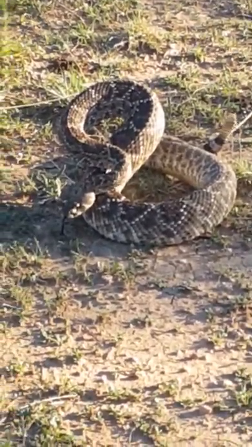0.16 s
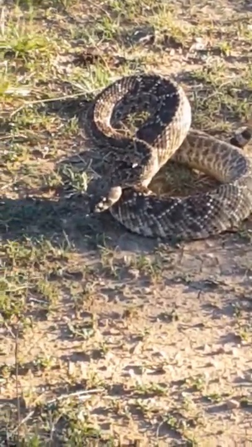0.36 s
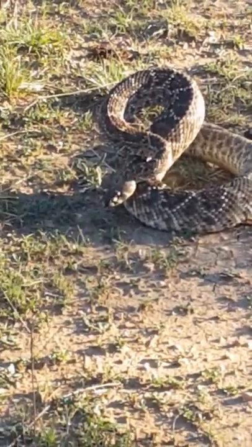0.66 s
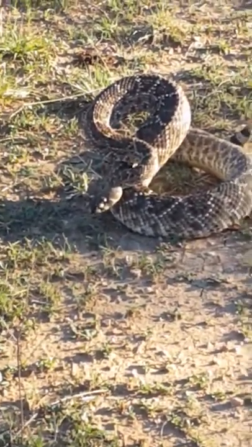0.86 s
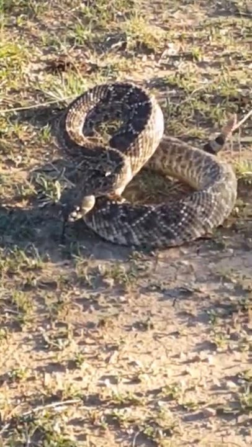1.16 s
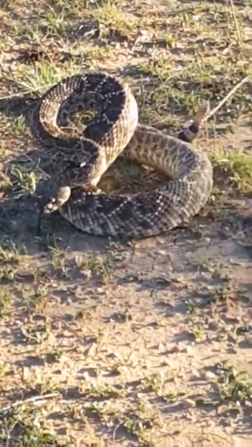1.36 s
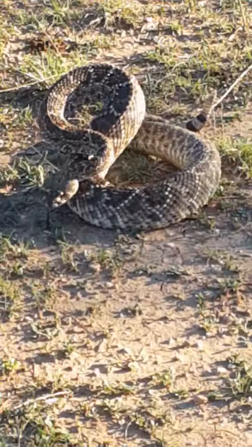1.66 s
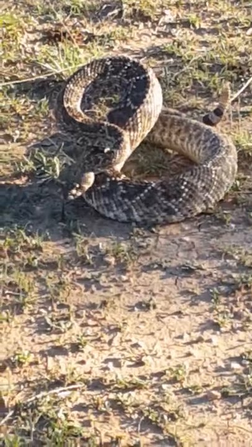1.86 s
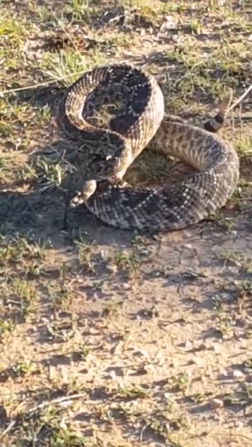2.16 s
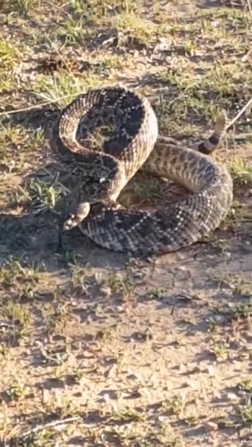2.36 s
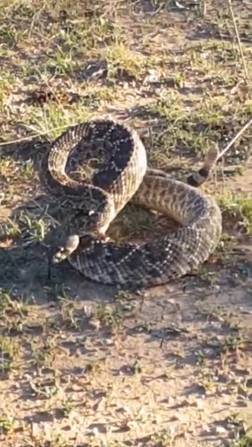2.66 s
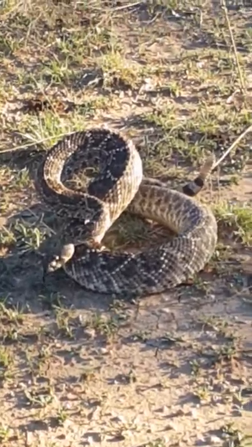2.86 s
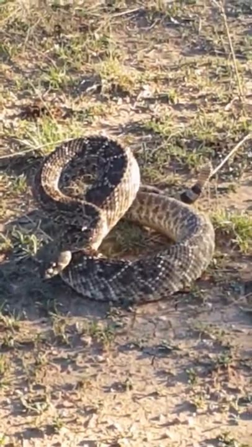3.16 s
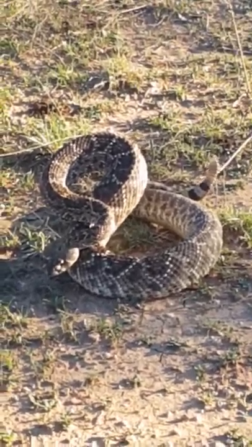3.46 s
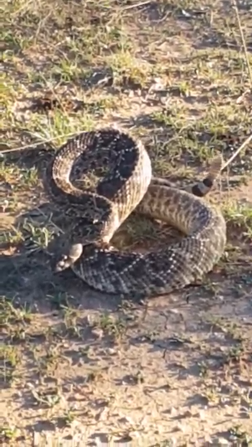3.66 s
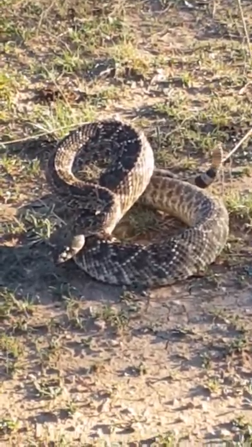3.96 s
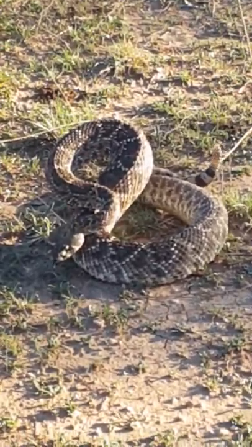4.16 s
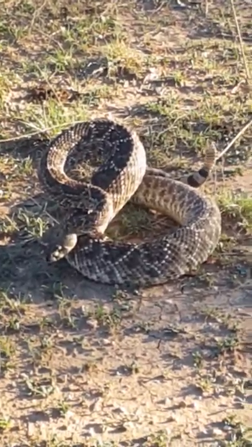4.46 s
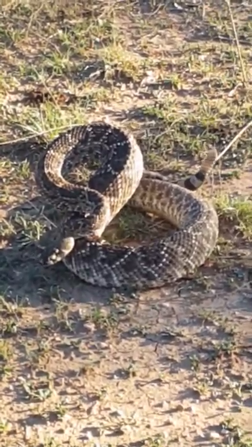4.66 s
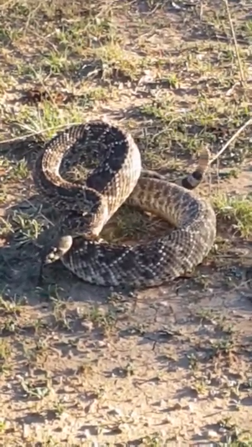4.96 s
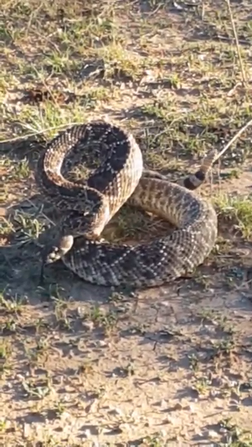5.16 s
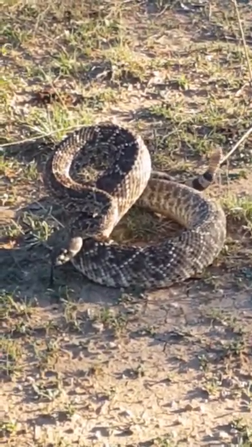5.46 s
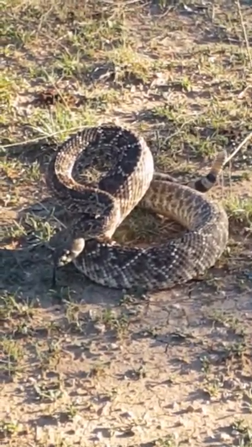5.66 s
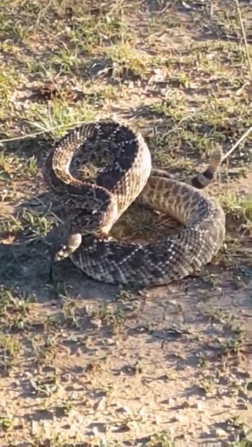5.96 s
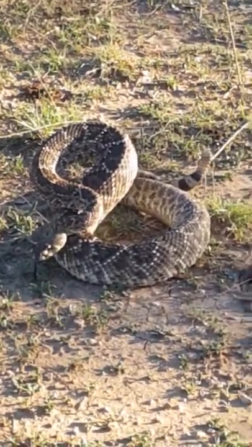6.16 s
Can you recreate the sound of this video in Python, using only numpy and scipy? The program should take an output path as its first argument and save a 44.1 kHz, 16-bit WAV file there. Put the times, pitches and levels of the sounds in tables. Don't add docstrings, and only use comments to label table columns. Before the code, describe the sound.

A rattlesnake a few steps away rattles without a break from beginning to end: a dry, hissy, bright buzz made of about two dozen tiny click bursts each second, slightly uneven, some bursts starting with a sharper crack. Underneath, low wind flutters thump left and right separately, mostly in the first half, and a distant road hums very faintly. Open dry ground, almost no echo, hand-held stereo phone microphone.

```python
import sys
import numpy as np
from scipy import signal
from scipy.fft import rfft, irfft, next_fast_len
from scipy.io import wavfile
from scipy.ndimage import uniform_filter1d, map_coordinates

SR = 44100
rng = np.random.default_rng(int(sys.argv[2]) if len(sys.argv) > 2 else 0)


def put_to_file(sound):
    columns = np.atleast_2d(sound).T
    safe = np.clip(columns, -1, 1)
    whole_steps = np.round(safe * 32767)
    wavfile.write(sys.argv[1], SR, whole_steps.astype(np.int16))


def undo_db(level):
    steps = np.asarray(level, float) / 20
    return 10 ** steps


N = 278094

# time in s, hum level in dB, upper band over the hum in dB, hum centre in Hz.
ROAD = [
    (0.0, -64, -15, 737),
    (0.7, -61, -7, 735),
    (1.4, -62.5, -10, 715),
    (1.7, -62, -5.5, 660),
    (2.6, -63, -6, 653),
    (3.6, -64.5, -2, 637),
    (4.6, -62, 2, 682),
    (5.7, -62.5, -3, 680),
    (6.3, -65, -1.5, 732),
]
# centre in Hz, width in Hz.
HUM_BANDS = [(620, 117), (700, 107), (780, 62)]
# frequency in Hz, gain in dB.
HUSH = [(40, -25), (300, -7), (500, -1), (1100, -7), (1500, -15), (2000, -19), (3500, -24), (8000, -40),
        (16000, -40)]
# frequency in Hz, gain in dB.
BUFFET = [(15, -52), (30, 3), (60, -0.5), (105, 4.5), (170, -7), (260, -20), (400, -37.5), (1000, -54)]
# time in s, left level in dB, right level in dB.
BREEZE = [(0.0, -59.5, -40.5), (0.2, -63.0, -48.2), (0.55, -66, -50.5), (0.75, -50, -53), (1.3, -63, -38.5),
          (1.62, -47.5, -55), (1.76, -53, -34), (2.1, -55, -41), (2.45, -59, -49), (2.9, -52.5, -49),
          (3.2, -57, -53.5), (3.55, -57, -63), (3.75, -61, -56), (4.8, -64.5, -55), (5.1, -58, -55),
          (5.75, -59.9, -48.8), (6.1, -56, -47.5), (6.3, -55, -45)]
# time in s, peak in dB, half length in ms.
PUFFS_LEFT = [(0.061, -48, 16), (0.31, -36, 7.4), (0.389, -47, 28), (0.609, -44, 14), (0.653, -41, 11),
              (0.725, -40, 22), (0.881, -58, 28.0), (0.953, -47.7, 10.0), (1.131, -49.6, 18.0),
              (1.247, -43, 66), (1.455, -29, 15.3), (1.682, -37, 21), (1.811, -32, 34), (1.917, -46, 41),
              (2.184, -53, 11.0), (2.264, -50, 35), (2.396, -47, 26), (2.504, -46, 9.5), (2.804, -47, 15),
              (3.018, -43, 10), (3.452, -51, 50.0), (4.644, -52, 47.0), (4.922, -38.5, 15), (4.98, -40, 16),
              (5.308, -56, 13), (5.868, -45, 7.2), (6.058, -43.8, 17), (6.172, -43, 41)]
# time in s, peak in dB, half length in ms.
PUFFS_RIGHT = [(0.071, -40, 3.8), (0.446, -42.6, 29), (0.601, -46, 17), (0.638, -43, 8.3),
               (0.696, -47, 28.0), (0.855, -36, 61), (1.015, -43, 57), (1.174, -43, 12), (1.31, -32, 5.6),
               (1.393, -42, 24), (1.508, -52, 22.0), (1.786, -52, 60), (1.967, -44.4, 20.0),
               (2.056, -53, 10.0), (2.306, -33, 8.7), (2.349, -35.6, 7), (2.409, -34, 48),
               (2.559, -37.5, 13.0), (2.684, -39, 71), (3.027, -54, 51), (3.494, -41, 37),
               (4.055, -46.3, 8.8), (4.716, -51, 34), (5.05, -41, 36), (5.174, -36.5, 21),
               (5.397, -43.5, 23), (5.956, -39.6, 9.2), (6.178, -33, 36)]
# time in s, lag in ms, strength in dB.
TAIL = [(0.0, 11.5, -37), (0.379, 9.5, -37), (0.59, 18.5, -37), (0.883, 21, -37), (1.051, 34, -38.5),
        (1.387, 29, -36), (1.638, 45.5, -38.5), (2.061, 44.5, -38), (2.227, 29.2, -36.5),
        (2.774, 43, -36.5), (3.824, 38.5, -39), (3.993, 40.5, -39), (4.37, 20.5, -36), (4.664, 30.5, -39),
        (5.376, 20.5, -38.5), (5.841, 27.5, -40.5), (6.176, 15.5, -39), (6.303, -5.5, -33.5)]
# time in s, level over the usual in dB, length over the usual (ratio).
ODD_SWINGS = [(0.425, -0.5, 1.3), (0.471, 0.0, 1.3), (0.947, -1.7, 1.48), (1.037, 0, 1.37),
              (1.853, 3.5, 1.2), (2.386, -1.7, 1.34), (2.435, -3, 0.9), (2.771, -3, 1.37),
              (2.815, -3.5, 0.69), (3.199, -2.5, 0.9), (3.361, 2, 0.73), (3.454, -0.5, 1.18),
              (3.495, -1.3, 0.78), (3.694, -3.5, 0.94), (3.78, 3.5, 0.65), (3.856, -1.5, 0.61),
              (3.898, 1.2, 1.17), (4.038, -1.4, 0.58), (4.189, -3, 1.1), (4.237, -4.5, 0.66),
              (4.354, -7.5, 1.24), (4.387, -3, 0.64), (4.866, -2, 0.72), (5.016, -1, 0.4), (5.063, 4, 1.11),
              (5.65, 1.5, 1.02), (5.698, -2.7, 1.36), (5.867, -2.7, 1.16), (6.269, -5.5, 0.9),
              (6.298, -14, 0.35)]
CRACKS = [0.342, 0.6, 0.73, 1.027, 1.367, 1.844, 2.212, 2.289, 2.596, 2.931, 2.974, 3.353, 3.395, 3.775,
          4.262, 4.305, 4.428, 4.469, 4.601, 5.014, 5.185, 5.35, 5.525, 5.643]
# frequency in Hz,
# left gain in dB, right gain in dB.
SHELL = [(1300, -29.5, -27.7), (2000, -29.5, -29.4), (2550, -19.6, -18.9), (3300, -17.3, -21.5),
         (3950, -8.1, -10.8), (4750, -6.7, -1.5), (5150, -7.8, -1.2), (5950, -3.3, -0.4),
         (6500, -13.1, 0.7), (6700, -14.3, -0.3), (7700, -14.0, -13.7), (8600, -21.6, -20.9),
         (9500, -26.5, -28.1), (10000, -24.4, -26.4), (10600, -27.7, -20.0), (11300, -23.8, -17.8),
         (12200, -21.2, -15.8), (13100, -22.0, -21.1), (13900, -22.4, -19.0), (14500, -24.0, -22.3),
         (15100, -20.0, -19.4), (15700, -20.9, -20.0)]
# frequency in Hz, shared power (0 to 1).
ALIKE = [(1300, 0.6), (2500, .95), (4500, .9), (6500, 0.7), (8500, .95), (9700, 0.4), (12000, 0.8),
         (15500, 0.45)]
# frequency in Hz, phase in radians.
LEAD = [(0, 0), (1120, 1.0), (2070, -0.1), (3270, 0.8), (4130, -0.7), (5430, -0.1), (6290, -1.8),
        (7490, 0.5), (8870, 0.1), (9220, 0.6), (10100, 5.0), (11400, 7.0), (13900, 6.9), (15900, 7.7)]


def unit(x):
    return x / np.sqrt(np.mean(x ** 2) + 1e-20)


def along(points, hz):
    f, *cols = np.transpose(points)
    return np.array([np.interp(np.log(hz + 1), np.log(f + 1), c) for c in cols])


def curves(rows):
    s, *cols = np.transpose(rows)
    t = np.arange(N) / SR
    return [np.interp(t, s, c) for c in cols]


def wobble(rate):
    knots = rng.standard_normal((2, 3000))
    return np.array([map_coordinates(k, [np.arange(N) * rate / SR]) for k in knots])


def filtered(x, response):
    size = 2 * next_fast_len(N // 2 + 4096)
    spectrum = rfft(x, size) * response(np.fft.rfftfreq(size, 1 / SR))
    return irfft(spectrum, size)[..., :N]


def roar(hz, width_hz, alike):
    noise = rng.standard_normal((3, N))
    mixed = np.sqrt(alike) * noise[0] + np.sqrt(1 - alike) * noise[1:]
    lean = np.exp(1j * 0.31 * np.array([[1], [-1]]))

    def peak(f):
        damping = (f * width_hz) ** 2
        return lean * damping / ((hz * hz - f * f) ** 2 + damping)

    return unit(filtered(mixed, peak))


def distance():
    hum_db, upper_db, hum_hz = curves(ROAD)
    centres = [hz for hz, _ in HUM_BANDS]
    shares = [np.sqrt(np.interp(hum_hz, centres, one)) for one in np.eye(len(HUM_BANDS))]
    hum = sum(share * roar(*band, alike=1.0) for share, band in zip(shares, HUM_BANDS))
    upper = undo_db(upper_db) * roar(hz=933, width_hz=193, alike=0.58)
    road = undo_db(hum_db + 2.1 * wobble(7)[0]) * (hum + upper)
    noise = rng.standard_normal((3, N))
    hush = filtered(0.68 * noise[0] + 0.65 * noise[1:], lambda hz: undo_db(along(HUSH, hz)))
    return road + undo_db(-62.5) * unit(hush)


def eddies(stretch, size=1500):
    x = unit(filtered(rng.standard_normal((2, N)), lambda hz: undo_db(along(BUFFET, hz / stretch))))
    power = np.abs(uniform_filter1d(x ** 2, size))
    return unit(x / np.sqrt(power + 0.1))


def puffs(rows):
    t = np.arange(0, N, 32) / SR
    s, db, half_ms = np.transpose(rows)[:, :, None]
    bells = undo_db(db) * np.exp(-((t - s) * 1000 / half_ms) ** 2)
    return np.interp(np.arange(N) / SR, t, np.sum(bells, 0))


def wind():
    breeze = undo_db(np.array(curves(BREEZE)) + 3.8 * np.tanh(wobble(18)))
    push = breeze + [puffs(PUFFS_LEFT), puffs(PUFFS_RIGHT)]
    level_db = 20 * np.log10(push) + 3.0 * np.tanh(wobble(40))
    high_gain = undo_db(-11 + 0.42 * (level_db + 43.5))
    gust = undo_db(level_db + 2.0) * (eddies(0.92) + high_gain * eddies(1.55))
    return filtered(gust, lambda hz: hz ** 3 / (hz ** 3 + 52 ** 3))


def swings():
    swings_per_s, usual_rise_ms, usual_fall_ms = 23.8, 9, 12
    beat = np.arange(int(N / SR * swings_per_s) + 1) / swings_per_s
    s, lag_ms, tail_db = np.transpose(TAIL)
    time = beat + np.interp(beat, s, lag_ms) / 1000
    db = np.interp(beat, s, tail_db)

    def nearest(moments):
        return np.abs(time - moments[:, None]).argmin(1)

    odd_s, odd_db, odd_length = np.transpose(ODD_SWINGS)
    crack_s = np.array(CRACKS) + 5.5 / 1000
    odd, crack = nearest(odd_s), nearest(crack_s)
    stray = rng.standard_normal((len(beat), 4))
    stray[odd] = 0
    stray[crack, ::2] = 0
    length = np.exp(0.06 * stray[:, 3])
    time[odd] = odd_s
    db[odd] += odd_db
    length[odd] = odd_length ** 1.2
    lean = np.exp(0.2 * stray[:, 2])
    rise_ms = usual_rise_ms * length * lean
    fall_ms = usual_fall_ms * length / np.sqrt(lean)
    time[crack] = crack_s
    rise_ms[crack] = usual_rise_ms * 0.6
    fall_ms[crack] *= 1.45
    stray_ms, stray_db = 1.2 * stray[:, 0], 0.58 * stray[:, 1]
    return np.array([time + stray_ms / 1000, db + stray_db, rise_ms, fall_ms])


def clicks(count, ring_ms, scatter_db, clack_db, size=20):
    s, db, rise_ms, fall_ms = swings()[:, :, None]
    place = np.linspace(-1, 1, count) + rng.uniform(-1, 1, (len(s), count)) / count
    place = 1.6 * place + 0.9 * place ** 5
    late_ms = place * np.where(place < 0, 0.85 * rise_ms, 0.62 * fall_ms)
    start = np.clip(np.round((s + late_ms / 1000) * SR), 0, N - 1).astype(int)

    bunching = np.tanh(np.sum([wobble(rate)[0][start] for rate in (110, 240)], 0))
    chance_db = scatter_db * rng.uniform(-1.3, 1, start.shape)
    share = undo_db(clack_db * bunching + chance_db - 0.63 * place ** 2 * np.abs(place))
    share = share / np.linalg.norm(share, axis=1, keepdims=True)
    strength = (start > 0) * (start < N - 1) * undo_db(db) * share

    n = np.arange(size)
    fade = np.exp(-n / SR / (ring_ms / 1000))
    at = (start[..., None] + n).ravel()
    turn = 2 * np.pi * rng.uniform(0, SR / 2, start.shape + (1,)) * n / SR
    takes = []
    for phase in rng.uniform(0, 2 * np.pi, (3,) + start.shape + (1,)):
        rings = strength[..., None] * fade * np.sin(turn + phase)
        takes.append(np.bincount(at, rings.ravel(), N + size)[:N])
    return np.array(takes)


def scatter(x, t60):
    keep = undo_db(-120 / (t60 * SR))
    power = signal.lfilter([1 - keep], [1, -keep], np.mean(x ** 2, 0))
    return np.sqrt(power) * rng.standard_normal(x.shape)


def ports(shared, own, alike):
    def share(hz):
        return np.clip(alike(hz), 0, 1)

    common = filtered(shared, lambda hz: np.sqrt(share(hz)))
    return common + filtered(own, lambda hz: np.sqrt(1 - share(hz)))


def causal(db):
    cepstrum = irfft(db * np.log(10) / 20)
    half = cepstrum.shape[-1] // 2
    cepstrum[..., 1:half] *= 2
    cepstrum[..., half + 1:] = 0
    return np.exp(rfft(cepstrum))


def rattle():
    shower = clicks(count=330, ring_ms=0.12, scatter_db=6.5, clack_db=2.5)
    shower = shower + undo_db(-9.5) * scatter(shower, t60=0.014)
    shower = shower + undo_db(-9.5) * scatter(shower, t60=0.26)
    pair = ports(shower[0], shower[1:], lambda hz: along(ALIKE, hz))

    def response(hz):
        low_cut_db = 18 * np.log2(np.clip(1300 / (hz + 30), 1, None))
        gain_db = along(SHELL, hz) - low_cut_db
        mean_db = gain_db.mean(0)
        lead = np.exp(0.5j * along(LEAD, hz) * [[1], [-1]])
        return undo_db(gain_db - mean_db) * lead * causal(mean_db)

    return undo_db(39.5) * filtered(pair, response)


def scene():
    return distance() + wind() + rattle()


def roll_off(x):
    return signal.sosfilt(signal.butter(12, 16370, fs=SR, output="sos"), x)


def record(dry):
    def edge(hz):
        return undo_db(np.interp(hz, (15700, 15900), (0, -30))) * (hz < 15900)

    mix = filtered(dry, edge) - 0.0006
    return roll_off(mix)


dry = scene()
out = record(dry)
put_to_file(out)
```